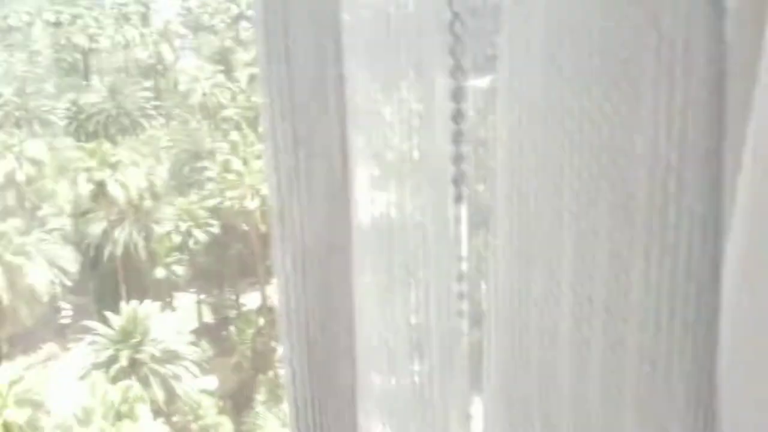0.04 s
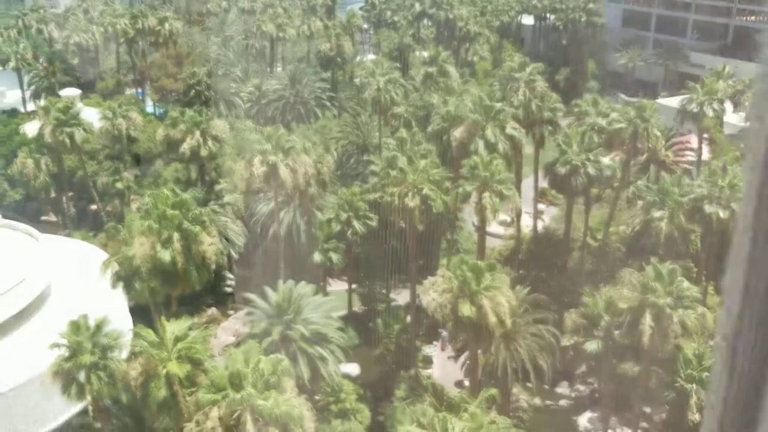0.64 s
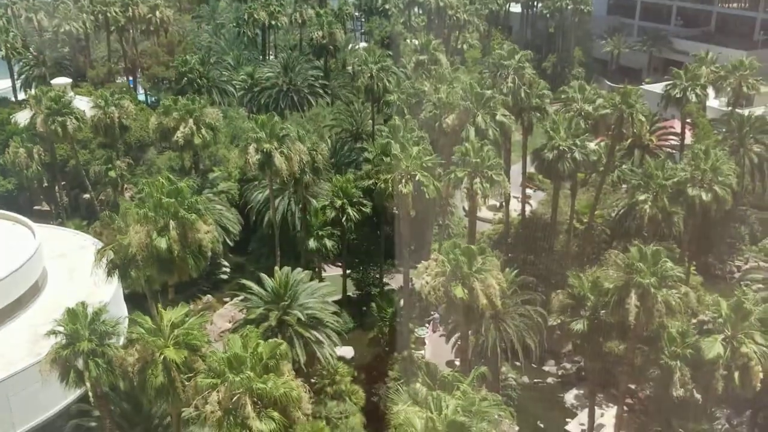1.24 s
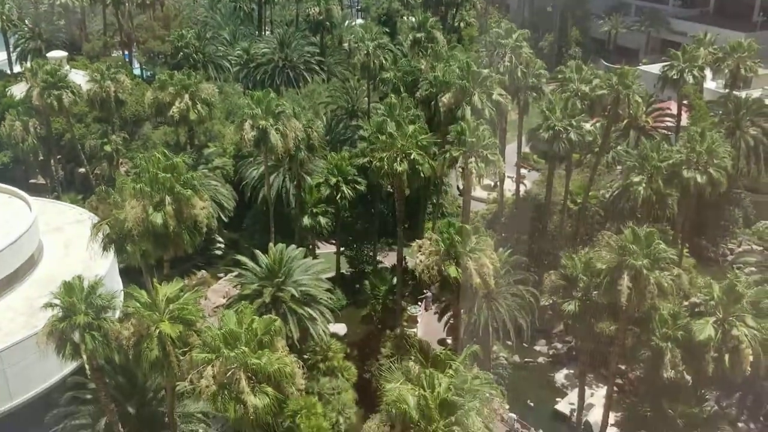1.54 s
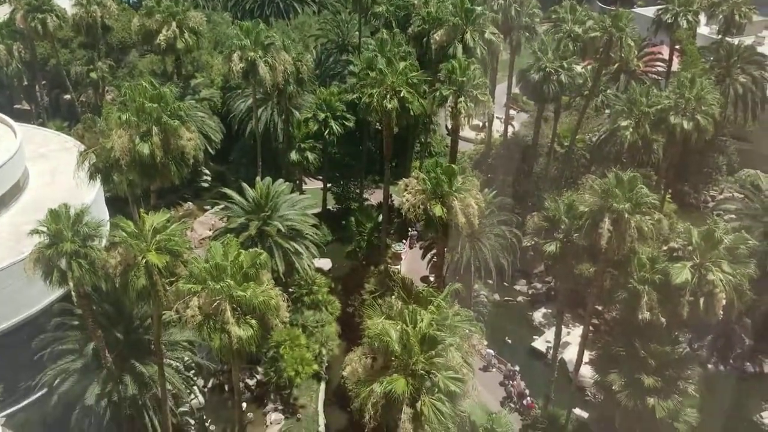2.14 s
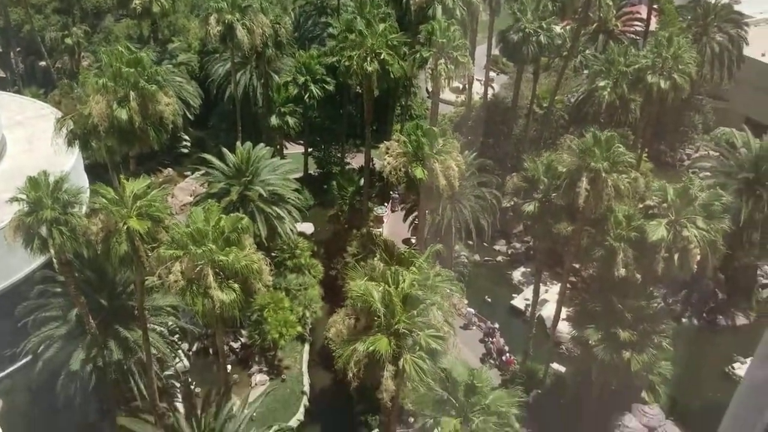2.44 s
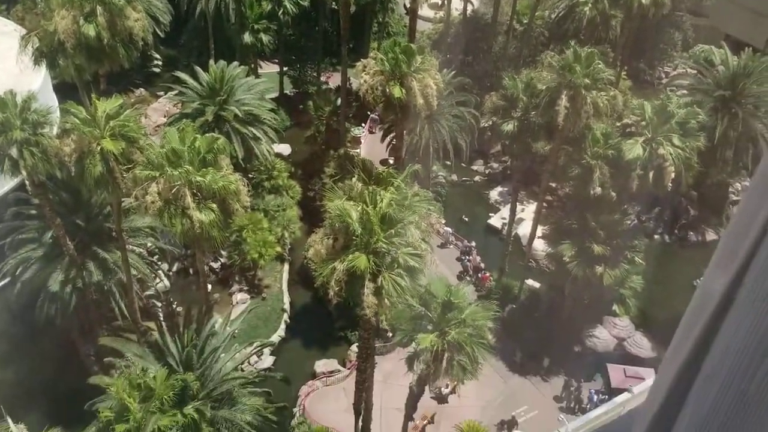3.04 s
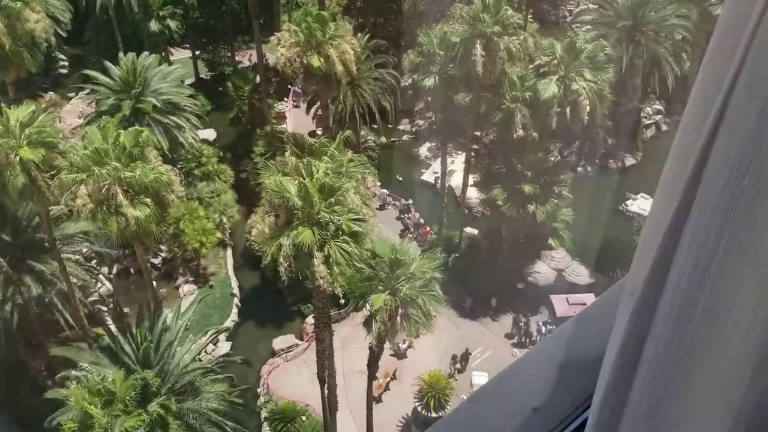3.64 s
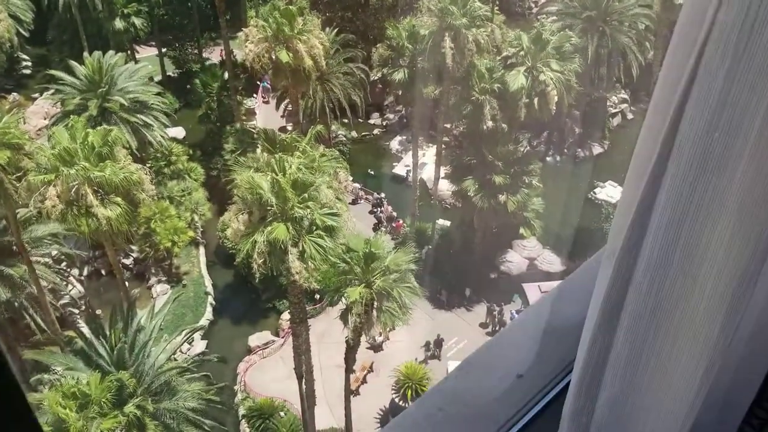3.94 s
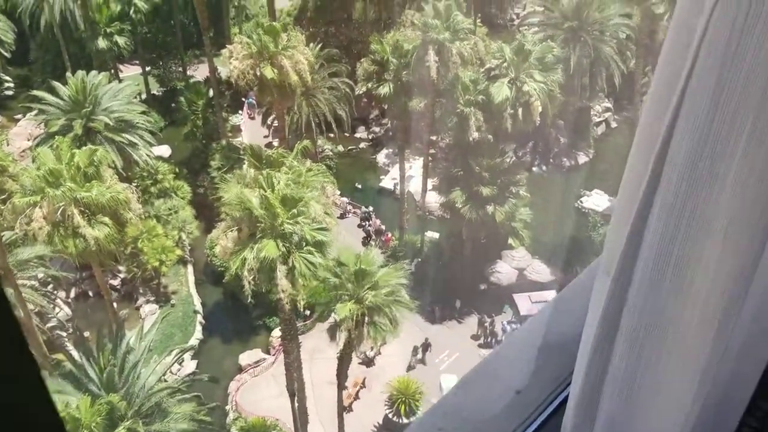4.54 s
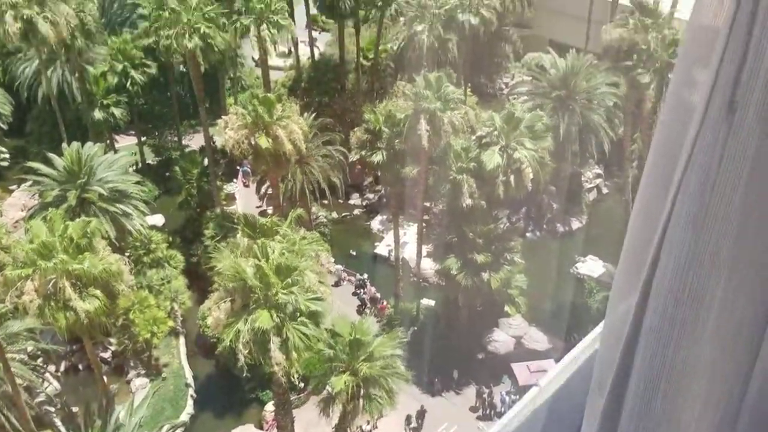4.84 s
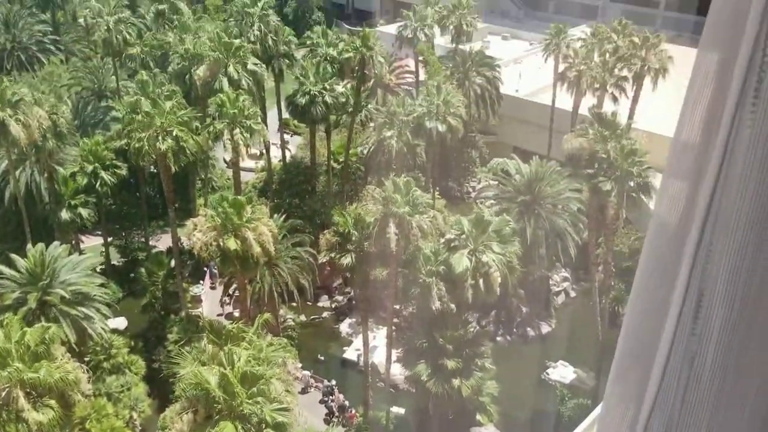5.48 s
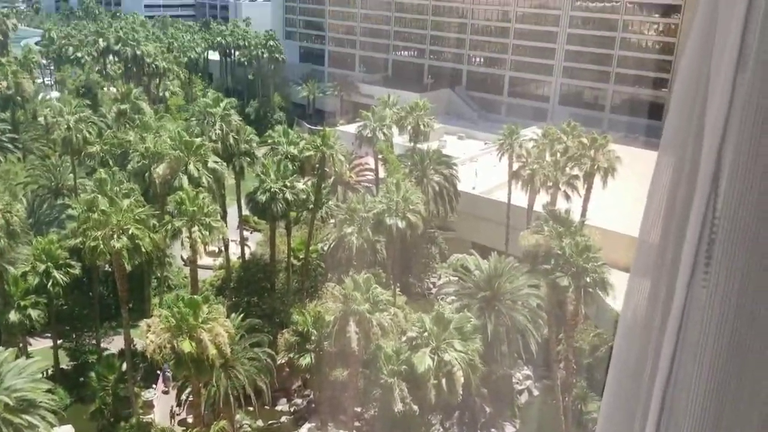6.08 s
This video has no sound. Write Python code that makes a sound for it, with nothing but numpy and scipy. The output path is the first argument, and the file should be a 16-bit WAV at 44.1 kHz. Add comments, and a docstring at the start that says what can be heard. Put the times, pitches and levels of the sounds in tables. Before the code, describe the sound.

Air conditioning hums in a quiet room as a hand sweeps a curtain open with sharp clicks, followed by soft fabric rubs.

```python
"""At the window of a quiet room, a hand sweeps a sheer curtain aside and holds it there.
The weave swishes, its ribs zip over the hand, runners chatter on the rail and the fittings click.
Creases tick as the cloth bunches; later a sleeve rubs and the taut cloth gives a thin squeak.
Underneath, the air conditioning hums and air rushes through the vent grille."""
import sys
import numpy as np
from scipy import signal
from scipy.fft import rfft, irfft, next_fast_len
from scipy.io import wavfile

SR = 44100
rng = np.random.default_rng(int(sys.argv[2]) if len(sys.argv) > 2 else 0)


def output_pcm(signal):
    """Save a mono or channel-first signal as 16-bit PCM at the path in sys.argv[1].

    Samples are clipped to [-1, 1] before scaling.
    """
    pcm = np.clip(np.atleast_2d(signal).T, -1, 1) * 32767
    wavfile.write(sys.argv[1], SR, np.round(pcm).astype(np.int16))


N = 278315
TIME = np.arange(N) / SR

# dull body of dragging folds and low knocks: freq_hz, level_db
DULL_SPECTRUM = [(150, -18.5), (320, -9.5), (480, -6.5), (650, -5.5), (820, 2.5), (950, -1), (1080, 0),
                 (1250, -5.5), (1500, -12.5), (2000, -5.5), (3500, -29)]
# stereo width of the curtain and its fittings: freq_hz, correlation
CLOTH_LIKENESS = [(300, 0.81), (700, 0.4), (1100, -0.25), (1450, -0.86), (2100, 0.0074), (3200, 0.073),
                  (3900, -0.46), (5200, -0.023)]
# their lean to one side: freq_hz, left_minus_right_db
CLOTH_BALANCE = [(400, -1), (750, 3.5), (1050, 1.5), (1400, -0.5), (2300, 2.5), (3100, 4), (4000, 1.5),
                 (5500, 6.5), (8000, 1.5), (13000, 2.5)]


def from_db(db):
    return 10 ** (np.asarray(db) / 20)


def unit_rms(x):
    return x / np.sqrt(np.mean(x ** 2) + 1e-20)


def pan(left_db):
    return from_db(np.array([[left_db], [-left_db]]) / 2)


def in_time(rows):
    """Each column of a timed curve, at every sample."""
    times, *columns = np.transpose(rows)
    return [np.interp(TIME, times, column) for column in columns]


def per_bin(points, size):
    """A curve over log frequency, read at the bins of an FFT."""
    hz, value = np.transpose(points)
    return np.interp(np.log(np.fft.rfftfreq(size, 1 / SR) + 1), np.log(hz), value)


def colour(x, spectrum):
    """Minimum-phase EQ in the shape of the spectrum; keeps the power of white noise."""
    size = next_fast_len(N + SR // 10, True)
    gain = unit_rms(from_db(per_bin(spectrum, size)))
    cepstrum = irfft(np.log(gain), size)
    cepstrum[1:size // 2] *= 2
    cepstrum[size // 2 + 1:] = 0
    return irfft(rfft(x, size) * np.exp(rfft(cepstrum)), size)[..., :N]


def stereo(pair, likeness=CLOTH_LIKENESS, balance=CLOTH_BALANCE):
    """Blends two unrelated signals into left and right, with width and lean set per frequency."""
    size = next_fast_len(N, True)
    alike = np.clip(per_bin(likeness, size), -.995, .995)
    mid, side = rfft(pair, size) * np.sqrt([1 + alike, 1 - alike]) / np.sqrt(2)
    lean = from_db(per_bin(balance, size) / 2)
    return irfft(np.array([(mid + side) * lean, (mid - side) / lean]), size)[:, :N]


def drift(rate_hz):
    """A smooth random wobble of rms 1."""
    hop, settle = 40, 2000
    pole = np.exp(-2 * np.pi * rate_hz * hop / SR)
    noise = rng.standard_normal(N // hop + settle + 2)
    slow = signal.lfilter([1], [1, -2 * pole, pole * pole], noise)[settle:]
    return np.interp(np.arange(N) / hop, np.arange(len(slow)), unit_rms(slow))


def swell(centre_s, half_length_s, db):
    """A bell-shaped envelope that peaks at db."""
    return from_db(db) * np.exp(-.5 * ((TIME - centre_s) / half_length_s) ** 2)


def phase(hz):
    return 2 * np.pi * np.cumsum(hz * np.ones(N)) / SR


def tone(hz):
    """A sine of rms 1 that follows a pitch curve."""
    return np.sqrt(2) * np.sin(phase(hz))


def narrow_noise(hz, half_width_hz):
    """Noise of rms 1 gathered round a steady or moving pitch."""
    turn = phase(hz)
    return drift(half_width_hz) * np.cos(turn) + drift(half_width_hz) * np.sin(turn)


def band_noise(hz, width=.17, size=N):
    """A stereo noise band of rms 1; width is the share of the pitch to each side."""
    edges_hz = [hz * (1 - width), min(hz * (1 + width), SR / 2 - 1)]
    band = signal.butter(2, edges_hz, "band", fs=SR, output="sos")
    return unit_rms(signal.sosfilt(band, rng.standard_normal((2, size))))


def friction(spectrum, slips_per_s, slip_db, flutter_db, image=(CLOTH_LIKENESS, CLOTH_BALANCE)):
    """Countless threads rub smoothly; some catch and slip with a tiny tick; the contact flutters."""
    slips = (rng.random(N) < slips_per_s / SR) * rng.standard_normal((2, N))
    rubbing = unit_rms(rng.standard_normal((2, N)) + from_db(slip_db) * unit_rms(slips))
    flutter = from_db(flutter_db * (.81 * drift(32) + .8 * drift(220)))
    return colour(stereo(rubbing, *image), spectrum) * flutter


def vent():
    """Air rushes from the vent and rings unevenly in its grille, under a thin hiss."""
    # low rush of air: freq_hz, level_db
    rush_spectrum = [(20, -6.5), (40, -8), (60, 6), (85, 2.5), (110, 3.5), (170, 3.5), (260, -5.5),
                     (400, -10), (560, -14.5), (720, -15.5), (950, -13), (1150, -19), (1550, -18),
                     (2050, -19.5)]
    # thin hiss: freq_hz, level_db
    hiss_spectrum = [(1500, -12), (2100, 2.5), (2500, -2), (3000, -3), (3600, -3.5), (4100, 11),
                     (4500, 5.5), (4850, 6.5), (5300, -2.5), (7300, -5.5), (8500, -29), (9700, -20),
                     (11500, -3.5), (16000, -3)]
    # steady grille resonances: pitch_hz, half_width_hz, level_db
    grille_modes = [(719, 25, -66), (820, 38.6, -71), (962, 38, -70), (1789, 32, -64)]
    # the highest grille ring shifts and fades: time_s, pitch_hz, level_db
    top_ring = [(0, 2050, -65), (2.2, 2053, -63), (2.9, 2122, -61.5), (4, 2038, -67), (5.2, 2018, -65.5),
                (6.31, 1995, -68)]
    # slow rise and fall of rush and rings: time_s, gain_db
    airflow = [(0, 1.5), (2.2, -0.5), (3.1, 1.5), (4.3, -0.5), (5.5, 1.3), (6.31, 0.5)]
    # stereo width of the room: freq_hz, correlation
    likeness = [(60, 0.94), (150, 0.97), (300, 0.66), (720, 0.56), (820, 0.28), (970, 0.097), (1550, -0.41),
                (1900, 0.2), (8000, -0.04)]
    # lean of the room: freq_hz, left_minus_right_db
    balance = [(60, 0), (170, 2), (400, -1.5), (900, 0), (1400, -4), (2000, -3), (2800, 7.5), (4400, 2),
               (9000, 2)]

    def air(spectrum):
        return colour(stereo(rng.standard_normal((2, N)), likeness, balance), spectrum)

    def ring(hz, half_width_hz, db):
        return from_db(db) * np.array([narrow_noise(hz, half_width_hz) for _ in range(2)])

    duct_lining = signal.butter(8, 2050, fs=SR, output="sos")  # swallows the treble
    rush = from_db(-44) * signal.sosfilt(duct_lining, air(rush_spectrum))
    rings = sum(ring(hz, width, db + 1.5 * drift(2.8)) for hz, width, db in grille_modes)
    top_hz, top_db = in_time(top_ring)
    rings += ring(top_hz, half_width_hz=62, db=top_db)
    hiss = from_db(-69) * air(hiss_spectrum)
    flow_db, = in_time(airflow)
    return from_db(flow_db) * (rush + stereo(rings, likeness, balance)) + hiss


def air_conditioner():
    """The motor hums, the blower drones with a waver and the duct resonates."""
    # motor hum: time_s, level_db
    motor_level = [(0, -45), (.8, -40.5), (1.08, -44), (1.33, -38.5), (1.68, -46.5), (2.45, -45),
                   (3.4, -42), (5.2, -40), (6.31, -42)]
    # blower drone: time_s, level_db
    blower_level = [(0.0, -37), (0.24, -43.5), (0.28, -47), (0.39, -36), (0.88, -41), (0.98, -32.5),
                    (1.18, -59), (1.23, -40), (2.39, -43), (2.43, -57), (2.69, -44.5), (3.27, -46),
                    (4.02, -39), (4.37, -43), (4.46, -57), (4.5, -49.5), (4.76, -44), (4.8, -52.5),
                    (5.39, -43), (5.41, -54), (5.69, -44.5), (5.76, -69), (5.83, -41.5), (6.15, -46),
                    (6.26, -32), (6.31, -37.5)]
    # its slow glide: time_s, pitch_hz
    blower_pitch = [(0, 154.9), (1.35, 154.8), (1.65, 150.4), (2.6, 153.2), (4.05, 146.5), (4.6, 152.4),
                    (6.31, 154.9)]
    # duct resonances: pitch_hz, half_width_hz, level_db
    duct_modes = [(180.6, 5.3, -53.5), (210, 3.9, -59), (237.8, 5.8, -59), (287.3, 7.2, -64.5),
                  (329.7, 4.7, -62), (349, 2.05, -64.5), (442, 12, -71)]
    # duct tones that bloom for a while: centre_s, half_length_s, pitch_hz, level_db
    duct_blooms = [(0.37, 0.06, 211, -53.5), (0.66, 0.27, 182, -45), (1.93, 0.076, 150, -49),
                   (0.42, 0.19, 333, -52.5), (2.44, 0.096, 350, -60), (2.745, 0.1, 331, -52),
                   (3.145, 0.1, 332, -48.5), (4.86, 0.18, 350, -52.5), (5.48, 0.13, 239, -48),
                   (5.33, 0.09, 334, -54), (4.11, 0.23, 238, -54.5), (5.03, 0.12, 240, -51)]
    motor_db, = in_time(motor_level)
    blower_db, = in_time(blower_level)
    blower_hz, = in_time(blower_pitch)
    motor = from_db(motor_db + drift(4.8)) * tone(hz=59.1 + .5 * drift(4))
    blower = from_db(blower_db + 2.26 * drift(14.4)) * tone(blower_hz + 3.32 * drift(12.2))
    duct = sum(from_db(db) * narrow_noise(hz, width) for hz, width, db in duct_modes)
    blooms = sum(swell(s, half, db) * tone(hz + 1.154 * drift(4.4)) for s, half, hz, db in duct_blooms)
    return motor * pan(left_db=.5) + (blower + duct + blooms) * pan(left_db=1.6)


def squeak():
    """Taut cloth creeps and sings in a thin, wavering glide that arches up and breaks off."""
    # path of the squeak: time_s, pitch_hz, level_db
    glide = [(5.69, 4150, -110), (5.73, 4200, -74), (5.755, 4653, -72), (5.775, 4820, -74),
             (5.805, 4440, -74), (5.845, 4580, -76), (5.885, 4860, -68), (5.91, 4760, -74),
             (5.925, 4980, -70), (5.945, 4870, -66), (5.97, 4550, -82), (6.003, 4780, -71),
             (6.05, 4700, -110)]
    rough_db, waver_hz = 3.5, 50
    hz, db = in_time(glide)
    return from_db(db + rough_db * drift(90)) * tone(hz + waver_hz * drift(200)) * pan(left_db=3.5)


def sleeve():
    """Short soft rubs of cloth as the arm shifts; each scuff rings hollowly at its own pitch."""
    # arm movements: centre_s, half_length_s, level_db, scuff_hz
    rubs = [(2.726, 0.02, -48.5, 1400), (2.852, 0.052, -56.5, 1100), (2.958, 0.021, -51.5, 1500),
            (3.645, 0.03, -51.5, 1220), (3.751, .03, -52, 1350), (3.806, 0.029, -48, 1250)]
    # soft rub of the sleeve: freq_hz, level_db
    spectrum = [(200, -7.5), (370, 5), (520, -5), (900, -5.5), (1250, -1), (1650, -4.5), (2200, -8),
                (3000, -14.5), (4500, -13), (9000, -36)]
    # its stereo width: freq_hz, correlation
    likeness = [(300, 1), (800, .2), (1250, 0.6), (1700, .2), (3500, .1), (4700, .6), (6000, 0.11)]
    # its lean: freq_hz, left_minus_right_db
    balance = [(400, -0.5), (1300, -4), (3000, -2.5)]
    strokes = sum(swell(s, half, db) for s, half, db, _ in rubs)
    scuffs = sum(swell(s, half, db - 5) * band_noise(hz) for s, half, db, hz in rubs)
    rubbing = friction(spectrum, slips_per_s=340, slip_db=-13, flutter_db=1.5, image=(likeness, balance))
    return strokes * rubbing + stereo(scuffs, likeness, balance)


def tiny_creases(count):
    """Tiny creases give way at random as the cloth bunches: start_s, level_db, pitch_hz."""
    when, size, pitch = rng.random((count, 3)).T
    return zip(2.4 - .2 * when, -58 + 6 * size, 3000 + 3500 * pitch)


def creases():
    """The cloth crinkles faintly as it bunches; single creases let go with dry, pitched ticks."""
    # creases snapping: start_s, level_db, pitch_hz
    snaps = [(.273, -40, 12900), (2.149, -55, 3920), (2.151, -53, 11400), (2.177, -52, 4200),
             (2.192, -57, 6060), (2.192, -53.5, 13600), (2.2336, -49, 5230), (2.259, -43, 3840),
             (2.259, -46, 5300), (2.277, -47, 5200), (2.31, -43, 2900), (2.311, -47, 5500),
             (2.329, -48, 5130), (2.345, -52, 6000), (2.326, -49, 11200), (2.3743, -48, 5800),
             (2.414, -50, 3900), (2.4825, -54, 3600), (2.431, -54, 12100), (2.46, -57, 12100),
             (2.493, -52, 11800), (2.543, -53, 11500), (2.673, -59, 9000)]
    # folds bunching: centre_s, half_length_s, level_db
    bunches = [(1.845, 0.14, -58.5), (2.199, .025, -59), (2.32, 0.02, -58.5), (2.503, 0.063, -62.5),
               (5.4, 0.077, -77.5), (5.96, .035, -78)]
    # their crisp crinkle: freq_hz, level_db
    spectrum = [(1500, -12), (3000, 1.5), (4500, 4.5), (6500, 3), (8000, -18.5), (9000, -9), (11800, -4.5),
                (13500, -22), (16000, -15)]
    rise_s, t60_s = .00088, .027
    t, ticks = TIME[:SR // 10], np.zeros((2, N))
    envelope = from_db(-60 * t / t60_s) * (1 - np.exp(-t / rise_s))
    for s, db, hz in [*snaps, *tiny_creases(count=24)]:
        start = round(s * SR)
        ticks[:, start:start + len(t)] += from_db(db) * envelope * band_noise(hz, size=len(t))
    bunching = sum(swell(s, half, db) for s, half, db in bunches)
    crinkle = friction(spectrum, slips_per_s=1700, slip_db=-3, flutter_db=4)
    return ticks * pan(left_db=5) + bunching * crinkle * pan(left_db=3)


def pings():
    """A bead, hook or taut crease rings briefly at a pitch of its own."""
    # small parts ringing: start_s, pitch_hz, level_db, t60_s
    rings = [(.012, 982, -27, 0.065), (.012, 755, -32.5, 0.048), (.011, 3810, -17, 0.012),
             (.403, 945, -25, 0.058), (.4026, 2290, -19.5, 0.019), (.4026, 4250, -20, 0.021),
             (.4026, 5650, -26, .03), (.274, 12900, -38, 0.023), (.546, 818, -29.5, 0.077),
             (1.5278, 3250, -29.5, 0.028), (1.5278, 2000, -39, .03), (1.998, 4150, -39, 0.022),
             (2.193, 14000, -52, .03), (2.194, 6250, -52, 0.044), (2.278, 5700, -51, .035),
             (2.328, 11450, -54, .035), (2.43, 12050, -58, .05)]
    rise_s, channel_phase_rad = .00051, [[0], [1]]
    out = np.zeros((2, N))
    for s, hz, db, t60_s in rings:
        age = np.maximum(TIME - s, 0)
        rise = 1 - np.exp(-age / rise_s)
        decay = from_db(db - 60 * np.minimum(age / t60_s, 2))
        out += rise * decay * np.sin(2 * np.pi * hz * age + channel_phase_rad)
    return out


def clicks(starts_s, levels_db, spectrum, t60_s, room_t60_s, room_db):
    """Each click is a short, dense ring followed by the tail of the room."""
    t, out = TIME[:SR // 2], np.zeros((2, N))
    decay = from_db(-60 * t / t60_s) + from_db(room_db - 60 * t / room_t60_s)
    for s, db in zip(starts_s, levels_db):
        start = round(s * SR)
        out[:, start:start + len(t)] += from_db(db) * decay * rng.standard_normal((2, len(t)))
    return colour(stereo(out), spectrum)


def fittings():
    """The curtain fittings clack, with a low knock and a bright snap in varying shares."""
    # hits of the fittings: start_s, clack_db, knock_offset_db, snap_offset_db
    hits = [(.011, -30, -10, -29), (.043, -30.5, -30, -18), (.111, -48, -20, -1), (.186, -36.5, -8, -14),
            (.4022, -15.5, -19, -5), (.4058, -26, -11.5, -7), (.4105, -29.5, -9, -14),
            (.418, -31, -14, -16), (.518, -33, -2, -11), (.556, -27, -9, -14), (0.93, -36.5, -20, -10),
            (1.5262, -37.5, -31, 4), (1.5275, -31.5, -26, -3), (1.669, -46.5, -1, -3), (1.854, -50, -7, -6),
            (1.9975, -45, -30, -12)]
    # plastic clack: freq_hz, level_db
    clack_spectrum = [(200, -20.5), (900, -9.5), (1400, -11), (2000, 1), (3100, 0), (4200, 2.5), (5200, -8),
                      (6500, -15), (8800, -25), (16000, -64)]
    # bright snap: freq_hz, level_db
    snap_spectrum = [(3000, -9), (6500, 1), (8000, -9.5), (9000, -11.5), (10200, -7.5), (11000, -7.5),
                     (12200, 1), (13300, -3), (14500, -2), (16000, 0)]
    starts_s, db, knock_db, snap_db = np.transpose(hits)
    clack = clicks(starts_s, db, clack_spectrum, t60_s=.026, room_t60_s=.16, room_db=-13)
    knock = clicks(starts_s, db + knock_db, DULL_SPECTRUM, t60_s=.064, room_t60_s=.94, room_db=-7)
    snap = clicks(starts_s, db + snap_db, snap_spectrum, t60_s=.033, room_t60_s=.15, room_db=-14)
    return clack + knock + snap


def grip(start_s, length_s, attack_s, release_s):
    """One tug builds up, holds and lets go."""
    held = np.clip(TIME - start_s, 0, length_s)
    after = np.maximum(TIME - start_s - length_s, 0)
    return (1 - np.exp(-held / attack_s)) * np.exp(-np.minimum(after / release_s, 20))


def tugging():
    """The hand's tugs drive four envelopes (swish, drag, fizz, zip) and a gliding rib rate."""
    # tugs: start_s, length_s, attack_s, release_s, swish_db, drag_db, fizz_db, zip_db, rib_rate_hz
    tugs = [(0.099, 0.098, 0.049, 0.026, -45, -49, -50, -36, 2915),
            (0.284, 0.15, 0.0237, 0.038, -43.5, -42.5, -47.5, -35, 3014),
            (0.473, 0.053, 0.0093, 0.021, -29, -39, -42, -32, 3660),
            (0.545, 0.041, 0.012, 0.04, -33.5, -43, -43, -31.5, 3900),
            (0.621, 0.0664, .015, 0.039, -35.5, -45.5, -44, -37, 3970),
            (0.745, 0.068, 0.018, .012, -38, -44.5, -55, -37, 3716)]
    start, length, attack, release, *layers_db, rib_hz = np.transpose(tugs)
    grips = np.array([grip(*shape) for shape in zip(start, length, attack, release)])
    return from_db(layers_db) @ grips, np.interp(TIME, start + length / 2, rib_hz)


def runners(tug_swish):
    """Runners jostle on the rail: uneven short ticks that follow the strength of the tug."""
    # chatter on the rail: freq_hz, level_db
    spectrum = [(600, -15), (1080, -5), (1450, -19), (1750, -5), (2100, -6), (4200, 2.5), (6500, -4),
                (9000, -19.5), (12500, -11), (16000, -6.5)]
    ticks_per_s, t60_s = 90, .011
    knocks = (rng.random(N) < ticks_per_s / SR) * rng.uniform(.67, 1, N)
    ringing = signal.fftconvolve(knocks, from_db(-60 * TIME[:SR // 20] / t60_s))[:N]
    ticks = stereo(unit_rms(ringing * rng.standard_normal((2, N))))
    return from_db(-5) * tug_swish * colour(ticks, spectrum)


def ribs(tug_zip, rib_hz):
    """The ribs of the weave zip over the hand, higher in a faster tug; then the pleats run off it."""
    # soft zips of the pleats and hem: centre_s, half_length_s, pitch_hz, half_width_share, level_db
    pleat_zips = [(1.138, .045, 4050, .1, -47), (1.267, 0.11, 2460, 0.2, -46),
                  (1.394, 0.032, 4260, .12, -47.5), (1.4, .06, 6500, 0.078, -56),
                  (1.637, 0.084, 5640, 0.08, -50.5)]
    spread_hz = 850  # uneven ribs smear the zip to each side of its rate
    smear = signal.butter(3, spread_hz, fs=SR, output="sos")
    uneven = signal.sosfilt(smear, rng.standard_normal((2, 2, N)))
    turn = phase(rib_hz)
    zips = tug_zip * unit_rms(uneven[0] * np.cos(turn) + uneven[1] * np.sin(turn))
    pleats = sum(swell(s, half, db) * band_noise(hz, width) for s, half, hz, width, db in pleat_zips)
    return (zips + pleats) * pan(left_db=3.5)


def curtain(tug_swish, tug_drag, tug_fizz):
    """The moving weave swishes and its fibres fizz; tugs and the slide add the dull drag of folds."""
    # swish of the weave: freq_hz, level_db
    weave_spectrum = [(500, -52), (1000, -12), (1480, -2), (1950, -0.5), (2450, -1), (2950, -4),
                      (3350, -2.5), (4000, -0.5), (4800, -5.5), (6800, -15.5), (7700, -17.5), (8800, -36.5),
                      (16000, -44)]
    # fizz of the fibres: freq_hz, level_db
    fibre_spectrum = [(3000, -37), (6500, 2), (8000, -4.5), (8900, -10), (10000, -4.5), (11000, -3.5),
                      (12300, -1), (14000, -4), (16000, -1.5)]
    # the cloth slides beneath and after the tugs, then barely creeps: time_s, swish_db
    slide_level = [(0, -46), (.28, -47), (.66, -34), (.9, -42.5), (1.22, -39.5), (1.6, -45), (2.11, -63),
                   (3.95, -65.5), (4.3, -81.5), (6.31, -100)]
    # light brushes of the held curtain: centre_s, half_length_s, swish_db, fizz_db
    brushes = [(2.44, 0.13, -60.5, -67), (2.87, 0.1, -59.5, -65), (3.222, 0.11, -58.5, -62.5),
               (3.553, 0.16, -66.5, -63.5), (3.78, 0.068, -55, -62), (4.12, 0.037, -64.5, -62),
               (4.455, 0.063, -72, -69), (4.883, .14, -74.5, -71), (5.395, 0.13, -70, -79),
               (5.6, .05, -74, -79), (5.8, 0.069, -72, -85), (5.962, 0.048, -70, -85)]
    slide = from_db(in_time(slide_level)[0])
    slide_fizz = from_db(-35) * slide ** .48  # swings about half as many dB as the swish
    brush_swish = sum(swell(s, half, db) for s, half, db, _ in brushes)
    brush_fizz = sum(swell(s, half, db) for s, half, _, db in brushes)
    swish = np.hypot(tug_swish + brush_swish, slide)
    fizz = np.hypot(tug_fizz + brush_fizz, slide_fizz)
    drag = np.hypot(tug_drag, from_db(-13) * slide)
    weave = swish * friction(weave_spectrum, slips_per_s=800, slip_db=-5, flutter_db=1.1)
    fibres = fizz * friction(fibre_spectrum, slips_per_s=990, slip_db=-8, flutter_db=.96)
    folds = drag * friction(DULL_SPECTRUM, slips_per_s=240, slip_db=-5.5, flutter_db=1)
    return weave + fibres + folds


def window_bay(x):
    """Close hard surfaces add early echoes that comb the sound; the power stays the same."""
    # echoes off the pane, sill and wall: left_delay_s, right_delay_s, gain_db
    reflections = [(.0012, .0013, -42), (.0037, 0.0033, -14), (.0074, 0.011, -18), (0.0109, 0.022, -13),
                   (0.0177, 0.019, -20)]
    out = x.copy()
    for *delays_s, db in reflections:
        for channel, delay_s in enumerate(delays_s):
            lag = round(delay_s * SR)
            out[channel, lag:] += from_db(db) * x[channel, :N - lag]
    return out * np.std(x) / np.std(out)


def scene():
    """Cloth and runners in the window bay, with squeak, clicks and pings, over the air conditioning."""
    (swish, drag, fizz, zips), rib_hz = tugging()
    cloth = curtain(swish, drag, fizz) + runners(swish) + ribs(zips, rib_hz) + creases() + sleeve()
    return window_bay(cloth) + squeak() + fittings() + pings() + air_conditioner() + vent()


def record(dry):
    """The ends fade over a few milliseconds and the top is cut steeply."""
    fade_s, cutoff_hz = .003, 15900
    fade = np.minimum(np.minimum(TIME, TIME[-1] - TIME) / fade_s, 1)
    return signal.sosfilt(signal.ellip(12, .1, 80, cutoff_hz, fs=SR, output="sos"), dry * fade)


dry = scene()
out = record(dry)
output_pcm(out)
```